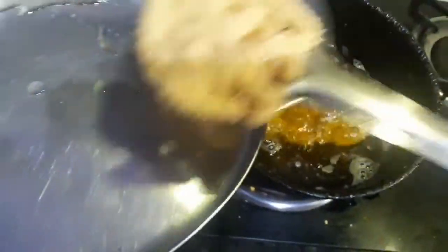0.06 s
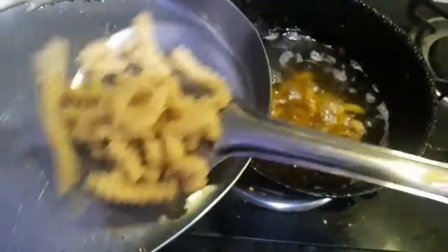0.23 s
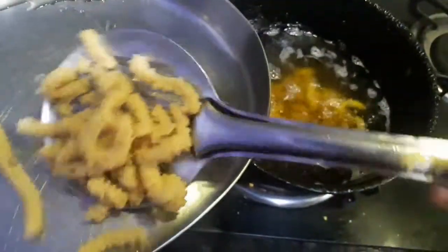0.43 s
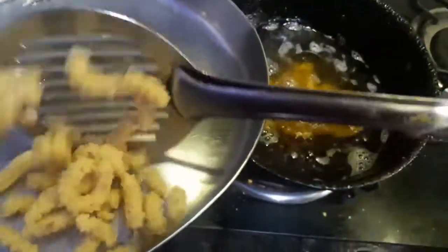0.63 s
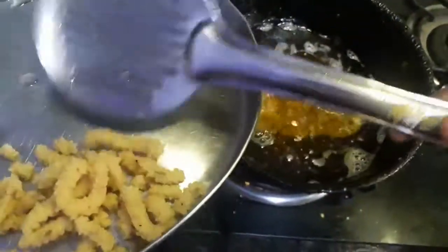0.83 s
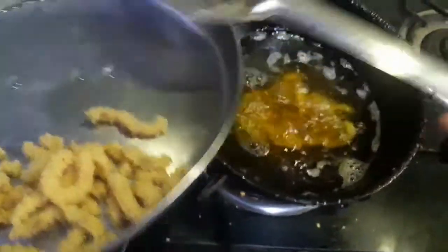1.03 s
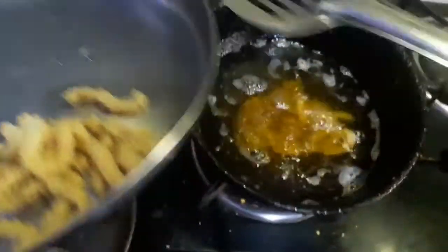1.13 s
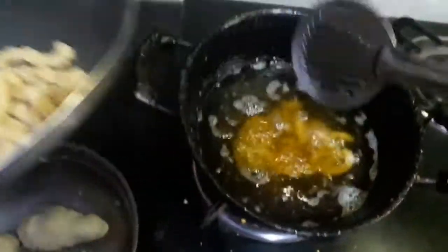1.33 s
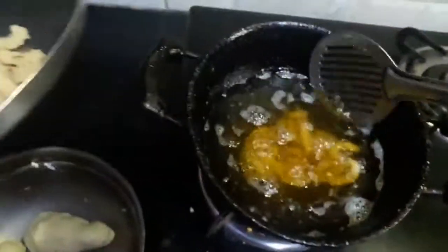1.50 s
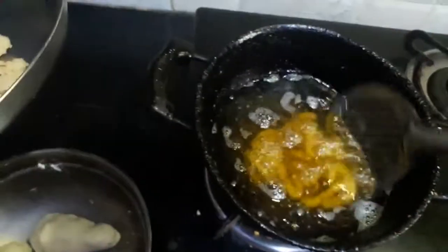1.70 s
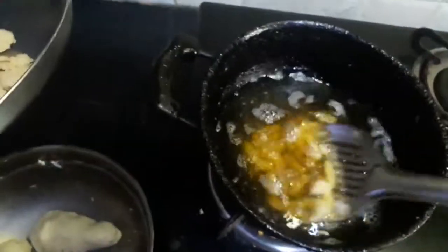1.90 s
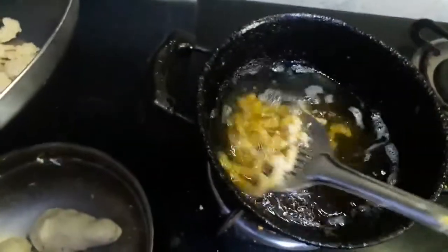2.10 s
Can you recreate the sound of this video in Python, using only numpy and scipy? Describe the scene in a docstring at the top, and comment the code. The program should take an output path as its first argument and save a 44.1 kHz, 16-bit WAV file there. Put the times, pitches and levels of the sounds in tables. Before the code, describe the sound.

Crisp fried pieces rattle into a steel bowl, starting with a ladle's knock at about 0.2 seconds. They tumble in crunchy clumps, busiest from 0.3 to 0.8 seconds, and settle by about 1 second. At 1.4 seconds the ladle clinks sharply on the pan, then scrapes and stirs until just past 2 seconds. Hot oil sizzles faintly throughout in the small kitchen, crackling louder during the stirring.

```python
"""Hot oil sizzles and spits in a small kitchen: each bursting bubble is a tiny pressure impulse.
A slotted ladle rubs and knocks a steel bowl, and crisp fried pieces slide off, tumble and settle.
Their impacts excite the bowl's modes, less strongly as the heap grows. The ladle then clinks on the
pan and stirs the next batch: friction drives the metal, the pan rocks and the oil crackles louder."""
import sys
import numpy as np
from scipy import signal
from scipy.fft import rfft, irfft
from scipy.io import wavfile
from scipy.ndimage import uniform_filter1d

SR = 44100
rng = np.random.default_rng(int(sys.argv[2]) if len(sys.argv) > 2 else 0)


def wrap_up_sound(samples):
    """Save the sound to the file named by the first command line argument, as 16-bit audio."""
    columns = np.atleast_2d(samples).T
    # keep every value between -1 and 1, then stretch to whole-number steps
    tamed = np.clip(columns, -1, 1)
    steps = np.round(tamed * 32767).astype(np.int16)
    wavfile.write(sys.argv[1], SR, steps)


N = 94815

# Spectral envelopes. Each row: frequency in Hz, relative level in dB.
ROOM_SPECTRUM = [(20, -29), (50, -12), (95, 2), (160, -4.5), (300, -6.5), (600, -10.5), (2000, -21),
                 (15000, -29)]
SIZZLE_SPECTRUM = [(300, -29), (800, -17.5), (1500, 5), (2000, -6.5), (2500, 0), (3200, -3.5), (4600, 5.5),
                   (6500, 5), (8700, -1.5), (10200, 9), (11800, 3.5), (15500, -2)]
STIRRED_OIL_SPECTRUM = [(200, -15), (600, -5), (1000, 3.5), (2800, 0), (3800, 6.5), (5000, -1), (8500, -1),
                        (10000, -5), (11500, -2.5), (15500, -7.5)]
SCRAPE_SPECTRUM = [(100, -8.5), (190, -16.5), (250, -2), (330, -12.5), (520, -11.5), (680, 4), (900, -3.5),
                   (1260, 5.5), (1600, -22), (2250, -8), (3200, -8.5), (6000, -7.5), (15000, -41)]
CLINK_SPECTRUM = [(60, -28), (220, -9.5), (370, -7), (520, -18), (830, 5.5), (1080, 2), (1450, -0.5),
                  (1850, -10.5), (2600, -3), (4200, -1), (6500, 2.5), (8500, 0), (9900, 6), (11500, -1),
                  (15500, -11)]
KNOCK_SPECTRUM = [(60, -19), (220, -1.5), (330, -9.5), (480, 5.5), (800, -13), (1500, 7.5), (2400, 4),
                  (3100, -1), (4200, -4), (5500, -7.5), (8000, -9), (10500, -4.5), (15500, -13)]
BOWL_SPECTRUM = [(30, -33), (90, -33), (160, -16), (240, -10), (370, -18.5), (460, -3), (1000, 1.5),
                 (2000, -0.5), (3800, -2), (5500, -5), (6800, -11), (10500, -7.5), (15500, -13.5)]
# Damping of densely spaced modes. Each row: frequency in Hz, time to fall 60 dB (T60) in seconds.
KITCHEN_DECAY = [(150, 0.12), (1000, 0.82), (5000, 0.31), (15000, 0.21)]
PAN_DECAY = [(200, 0.54), (1000, 0.16), (3000, 0.3), (7000, 0.17), (15000, 0.094)]
BOWL_DECAY = [(200, 0.32), (1000, 0.15), (3000, 0.18), (8000, 0.21), (15000, 0.064)]
# Distinct modes of the metal. Each row: frequency in Hz, relative energy in dB, T60 in seconds.
PAN_MODES = [(245, -17, .5), (900, -8, .15), (2562, -0.5, .2), (2950, -10, .5), (3833, -8, .21),
             (4194, 0, .19), (4408, -3, .2), (5443, -7, .15), (5690, -2, .1), (5912, -3, .1),
             (6401, -4, .14), (7076, -1, .13), (9760, -4, .1), (10105, -4, .12)]
LADLE_MODES = [(845, -13, .2), (1161, -12, .1), (1971, -4, .06), (2322, -1, .11), (2445, -2, .2),
               (2610, -7, .06), (2787, -7, .1), (3055, -7, .25), (3735, -5, .12), (4137, -5, .04),
               (4355, -4, .04), (7144, -15, .13)]
BOWL_MODES = [(231, -11, .28), (460, -8, .2), (556, -8, .28), (587, -4, .28), (975, 2.5, .29),
              (1121, -9, .25), (1243, -10, .25), (1373, -7, .25), (1437, -7, .25), (1900, -9, .22),
              (2143, -7, .24), (2454, -10, .2), (3074, -9, .2), (3277, -10, .22), (3478, -4, .25),
              (3745, -8, .22), (4494, -5, .27), (5658, -10, .2)]
# Oil spitting. Each row: start in seconds, energy in dB, pitch in Hz.
SPITS = [(0.0405, -18.5, 10240), (1.3798, -20.5, 10800), (1.7344, -18.5, 6500), (2.0744, -13.5, 9750),
         (2.0759, -13, 7100)]
# The heavy pan rocking on the stove. Each row: time in seconds, level in dB.
ROCKING = [(1.43, -81), (1.455, -53), (1.52, -65.5), (1.66, -75), (1.74, -70), (1.87, -69), (1.93, -53),
           (2.0, -59), (2.15, -67)]
# Stirring. Each row: time in seconds, relative scrape level in dB, level of the stirred oil in dB.
STIRRING = [(1.40, -74, -61), (1.57, -50, -55), (1.595, -46.5, -54.5), (1.65, -43, -58.5),
            (1.70, -44.5, -55.5), (1.735, -43, -45), (1.79, -52.5, -54), (1.85, -47.5, -48.5),
            (1.90, -49, -52), (1.97, -55, -46.5), (2.05, -51, -50.5), (2.10, -68, -55), (2.15, -55, -58)]
# Strokes of the ladle's edge over metal.
# Each row: start in seconds, length in seconds, level in dB, resonance in Hz, bandwidth in Hz.
RUBS = [(0.09, 0.56, -58.5, 2510, 350), (1.466, 0.12, -49, 2920, 70), (1.468, 0.11, -57, 2620, 50),
        (1.578, 0.16, -64, 1330, 350), (1.65, 0.2, -59, 663, 49.5), (1.668, 0.28, -51.5, 2200, 800),
        (1.867, 0.22, -53, 3800, 546)]
# Blows of the ladle on the pan. Each row: start in seconds, relative level in dB, treble cutoff in Hz.
CLINKS = [(1.4187, 7, 16700), (1.4194, -14, 11700)]
# Heaps dropping into the bowl. Each row: start in seconds, length in seconds, level in dB, pitch in Hz.
THUDS = [(.297, 0.027, -44.5, 190), (0.425, 0.026, -49.5, 97.4)]
# Pieces sliding over steel. Each row: time in seconds, relative level in dB.
SLIDING = [(.27, -35), (.31, -25), (.345, -43.5), (.39, -39), (.44, -40), (.495, -39), (.56, -31.5),
           (.63, -29.5), (.665, -32), (.70, -22.5), (.74, -34), (.80, -50.5), (.84, -36), (.89, -43),
           (.96, -53), (1.07, -57.5), (1.14, -54.5), (1.22, -61.5), (1.245, -59), (1.32, -69)]
# Clumps of pieces landing. Each row: start in seconds, relative level in dB,
# time constant of the scatter in seconds, treble cutoff in Hz, knock pitch in Hz.
LANDINGS = [(0.2802, 1.5, 0.0064, 1700, 1500), (0.2908, -1.5, 0.0087, 2460, 1770),
            (.305, -18, 0.0037, 11600, 960), (0.3131, 5.5, 0.011, 7300, 3900),
            (0.327, 1, 0.0071, 8750, 3700), (.338, -1, 0.0029, 2480, 1000),
            (0.4191, 0.5, 0.0041, 1780, 1574), (0.436, 0, 0.0051, 4870, 940),
            (0.448, 3.5, 0.0055, 1150, 850), (0.517, -3, 0.013, 2500, 2200), (0.532, 2, 0.0091, 2390, 1860),
            (0.552, 0, 0.016, 12200, 2390), (.593, 4, 0.035, 3470, 1530), (0.672, 3, 0.0047, 2530, 1470),
            (0.68, 5.5, 0.0056, 3100, 2050), (.692, 6, 0.0036, 4750, 1210), (0.717, 3.5, 0.018, 3580, 2260),
            (.729, -0.5, 0.0036, 5230, 2140), (0.74, -0.5, 0.012, 3520, 3500),
            (.779, -1, 0.013, 3960, 3670), (0.859, 2.5, 0.0033, 1630, 1140), (0.9227, 0, 0.002, 1880, 2250),
            (1.02, -16, 0.0091, 814, 950)]

TIME = np.arange(N) / SR
KNOCK_S = 0.2328  # the ladle meets the bowl


def amp(db):
    """Amplitude grows tenfold for every 20 dB."""
    return 10 ** (np.asarray(db) / 20)


def unit_rms(x):
    """Normalisation to a mean power of 1."""
    return x / np.sqrt(np.mean(x ** 2) + 1e-20)


def unit_energy(x):
    """Normalisation to a total energy of 1."""
    return x / np.sqrt(np.sum(x ** 2) + 1e-20)


def at_frequency(points, hz):
    """Interpolation on a logarithmic frequency axis."""
    freqs, values = np.transpose(points)
    return np.interp(np.log(hz + 1), np.log(freqs + 1), values)


def envelope(rows, column=1):
    """Amplitude envelope, linear in dB between rows and silent before the first."""
    rows = np.array(rows)
    return amp(np.interp(TIME, rows[:, 0], rows[:, column], left=-200))


def arch(start, length):
    """A half-sine envelope rises and falls once."""
    return np.sin(np.pi * np.clip((TIME - start) / length, 0, 1))


def add(mix, start, sound):
    """Superposition: a sound joins the mix at its start in seconds."""
    part = mix[round(start * SR):][:len(sound)]
    part += sound[:len(part)]


def convolve(x, response):
    """A linear system convolves its input with its impulse response."""
    return signal.fftconvolve(x, response)[:N]


def colour(x, spectrum):
    """A minimum-phase filter of unit energy imposes a spectral envelope."""
    hz = abs(np.fft.fftfreq(4096, 1 / SR))
    log_gain = np.log(amp(at_frequency(spectrum, hz)))
    response = np.fft.ifft(np.exp(np.conj(signal.hilbert(log_gain)))).real
    return convolve(x, unit_energy(response[:2048]))


def lowpass(x, hz):
    """A one-pole filter removes treble, as a soft contact does."""
    pole = np.exp(-2 * np.pi * hz / SR)
    return signal.lfilter([1 - pole], [1, -pole], x)


def resonate(x, hz, width_hz, stages=1):
    """Resonators in series each pass a band around hz at unit gain."""
    carrier = np.exp(2j * np.pi * hz * np.arange(1, len(x) + 1) / SR)
    for _ in range(stages):
        x = 2 * (carrier * lowpass(x / carrier + 1e-18, width_hz / 2)).real
    return x


def whiten(x):
    """Dividing a burst by its smoothed spectrum removes its broad colour."""
    spectrum = rfft(x, 2 * len(x))
    power = uniform_filter1d(abs(spectrum) ** 2, 128)
    return unit_energy(irfft(spectrum / np.sqrt(power + 1e-12))[:len(x)])


def clicks(per_s, spread_db, size=N):
    """A Poisson process: independent impulses of uneven strength."""
    strength = amp(spread_db * np.minimum(rng.exponential(1, size), 4))
    return strength * rng.choice([-1., 1.], size) * (rng.random(size) < per_s / SR)


def noise_burst(decay_s, size):
    """White noise decays exponentially with time constant decay_s."""
    return rng.standard_normal(size) * np.exp(-np.arange(size) / SR / decay_s)


def dense_ring(decay):
    """Overlapping modes merge into noise, each band dying at its own rate."""
    hz, t, bands = signal.stft(rng.choice([-1., 1.], SR // 2), SR, nperseg=256)
    bands = bands * amp(-60 * t / at_frequency(decay, hz)[:, None])
    return unit_energy(signal.istft(bands, SR, nperseg=256)[1])


def modal_ring(modes):
    """Free vibration is a sum of damped sinusoids, here of alternating sign."""
    t = np.arange(SR) / SR
    partials = (amp(db) * unit_energy(amp(-60 * t / t60) * np.cos(2 * np.pi * hz * t)) * (-1) ** k
                for k, (hz, db, t60) in enumerate(modes))
    return unit_energy(sum(partials))


def moving_ring(force, decay, cycles_per_s, count=3):
    """The response depends on the point of contact, so moving contacts crossfade dense rings."""
    angles = np.pi * (cycles_per_s * TIME + np.arange(count)[:, None] / count)
    weights = np.cos(angles) * np.sqrt(2 / count)
    return sum(convolve(force * weight, dense_ring(decay)) for weight in weights)


def room_tone():
    """Stationary noise, strongest in the bass, forms the noise floor."""
    return amp(-68.5) * unit_rms(colour(rng.standard_normal(N), ROOM_SPECTRUM))


def oil_spits(t60=0.015, size=2048):
    """Each spit is a transient of quickly decaying band-limited noise."""
    spits = np.zeros(N)
    for start, db, hz in SPITS:
        burst = rng.standard_normal(size) * amp(-60 * TIME[:size] / t60)
        add(spits, start, amp(db) * unit_energy(resonate(burst, hz, width_hz=1430, stages=2)))
    return spits


def frying_oil(bubbles_per_s=3000):
    """Bursting bubbles make shot noise, louder when stirred; the kitchen adds reverberation."""
    stirred = envelope(STIRRING, column=2)
    fizz = amp(-60) * unit_rms(colour(clicks(bubbles_per_s, spread_db=0.33), SIZZLE_SPECTRUM))
    fizz += stirred * unit_rms(colour(clicks(bubbles_per_s, spread_db=3.5), STIRRED_OIL_SPECTRUM))
    crackle = resonate(clicks(per_s=280, spread_db=3), hz=10000, width_hz=900, stages=2)
    fizz += amp(-8) * stirred * unit_rms(crackle)
    spits = oil_spits()
    reverberation = convolve(amp(-5) * fizz + amp(-11) * spits, dense_ring(KITCHEN_DECAY))
    return fizz + spits + reverberation


def pan_rocking(hz=74.4, waver_rad=0.53):
    """The pan rocks under the ladle: a low oscillation with random phase modulation."""
    drift = unit_rms(lowpass(lowpass(rng.standard_normal(N), 9.7), 9.9))
    return np.sqrt(2) * np.sin(2 * np.pi * hz * TIME + waver_rad * drift) * envelope(ROCKING)


def ladle_stirring(touch_s=1.4775, touch_hz=2856, touch_t60=0.042):
    """Stick-slip friction drives the pan's modes; one touch on its wall rings briefly."""
    slips = clicks(per_s=900, spread_db=3.2)
    scrape = colour(slips + moving_ring(slips, PAN_DECAY, cycles_per_s=2.96), SCRAPE_SPECTRUM)
    scrape += amp(-17) * convolve(slips, modal_ring(PAN_MODES))
    out = amp(-4.5) * unit_rms(scrape) * envelope(STIRRING)
    add(out, touch_s, amp(-13.5) * modal_ring([(touch_hz, 0, touch_t60)]))
    return out


def ladle_rubs():
    """Friction: tiny slips of metal on metal excite one resonance for each stroke."""
    out = np.zeros(N)
    for start, length, db, hz, width_hz in RUBS:
        slips = clicks(per_s=1500, spread_db=1.5)
        out += amp(db) * arch(start, length) * unit_rms(resonate(slips, hz, width_hz, stages=2))
    return out


def metal_contact(chatter_s, chatter_db):
    """The force of a hard impact is an impulse and a few milliseconds of chatter."""
    force = amp(chatter_db) * unit_energy(noise_burst(chatter_s, 2048))
    force[0] += 1
    return unit_energy(force)


def ladle_clink():
    """The empty ladle's impact and rebound set the pan into free vibration."""
    blows = np.zeros(N)
    for start, db, cutoff_hz in CLINKS:
        add(blows, start, amp(db) * lowpass(signal.unit_impulse(64), cutoff_hz))
    crack = convolve(blows, metal_contact(chatter_s=0.0011, chatter_db=36))
    dense = convolve(blows, dense_ring(PAN_DECAY))
    body = colour(amp(-3.5) * crack + amp(-5) * dense, CLINK_SPECTRUM)
    return body + amp(-3) * convolve(blows, modal_ring(PAN_MODES))


def ladle_knock():
    """A collision excites the modes of both bodies, the loaded ladle and the bowl."""
    body, partials = np.zeros(N), np.zeros(N)
    add(body, KNOCK_S, metal_contact(chatter_s=0.0035, chatter_db=15))
    add(body, KNOCK_S, amp(-3) * dense_ring(BOWL_DECAY))
    add(partials, KNOCK_S, amp(0.5) * modal_ring(LADLE_MODES) + amp(-19) * modal_ring(BOWL_MODES))
    return amp(2) * partials + colour(body, KNOCK_SPECTRUM)


def bowl_thuds():
    """Dropping heaps force the bowl through a few cycles of low vibration."""
    return sum(amp(db) * arch(start, length) * np.sin(2 * np.pi * hz * (TIME - start))
               for start, length, db, hz in THUDS)


def clump_contacts(scatter_s, size, first_share=0.32):
    """Impact energy divides between a firm contact and a dying scatter; each contact crumbles."""
    crunch = noise_burst(0.28 * scatter_s, size)
    scatter = clicks(per_s=1500, spread_db=3.2, size=size) * np.exp(-TIME[:size] / scatter_s)
    contacts = np.sqrt(1 - first_share) * unit_energy(scatter)
    contacts[0] += np.sqrt(first_share)
    return whiten(convolve(unit_energy(contacts), crunch)[:size])


def piece_force(contacts, cutoff_hz, knock_hz, q=3.4):
    """A piece's compliance dulls its contacts, and its damped resonance adds a short knock."""
    return lowpass(contacts, cutoff_hz) + resonate(contacts, knock_hz, knock_hz / q)


def fried_pieces(heap_db_per_s=10, size=4096):
    """Sliding and landing pieces excite the bowl; damping by the growing heap fades its clear modes."""
    force = lowpass(unit_rms(clicks(per_s=1100, spread_db=4.8)), 5700) * envelope(SLIDING)
    firm_force = force.copy()
    for start, db, scatter_s, cutoff_hz, knock_hz in LANDINGS:
        contacts = clump_contacts(scatter_s, size)
        add(force, start, amp(db - 0.5) * piece_force(contacts, cutoff_hz, knock_hz))
        add(firm_force, start, amp(db - 2) * piece_force(signal.unit_impulse(size), cutoff_hz, knock_hz))
    dense = moving_ring(force, BOWL_DECAY, cycles_per_s=8.98)
    body = colour(amp(-5) * force + amp(-3) * dense, BOWL_SPECTRUM)
    damping = amp(-heap_db_per_s * np.maximum(TIME - KNOCK_S, 0))
    return body + amp(-2) * damping * convolve(firm_force, modal_ring(BOWL_MODES))


def scene(side_db=-15):
    """The sources superpose at the centre; a faint difference signal widens the pan's treble."""
    room = room_tone()
    pan = ladle_clink() + ladle_stirring() + pan_rocking() + frying_oil()
    mid = room + pan + ladle_rubs() + ladle_knock() + bowl_thuds() + fried_pieces()
    treble = pan - lowpass(pan, 19000)
    flutter = unit_rms(lowpass(rng.standard_normal(N), 190))
    side = amp(side_db) * treble * flutter
    return np.array([mid + side, mid - side])


def record(dry):
    """A linear-phase low-pass filter limits the bandwidth."""
    taps = signal.firwin(511, cutoff=15780, window=("kaiser", 9), fs=SR)
    return signal.oaconvolve(dry, taps[None], "same")


dry = scene()
out = record(dry)
wrap_up_sound(out)
```